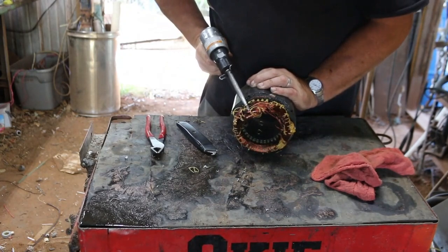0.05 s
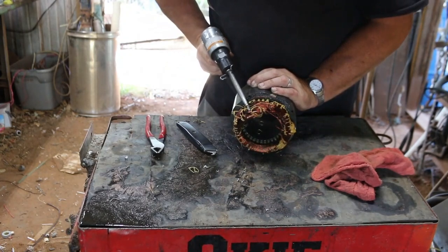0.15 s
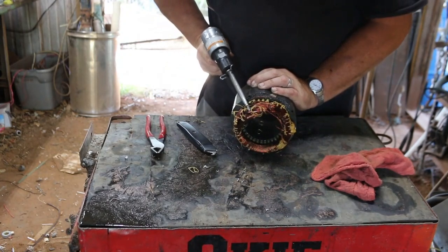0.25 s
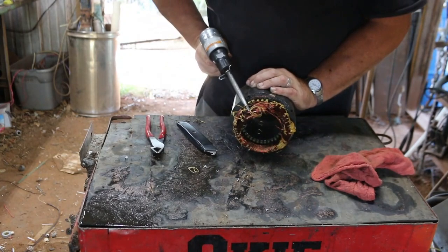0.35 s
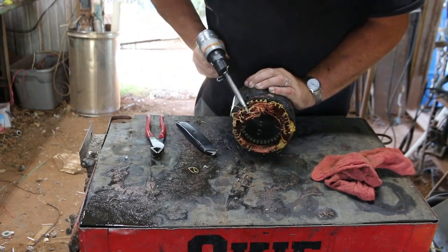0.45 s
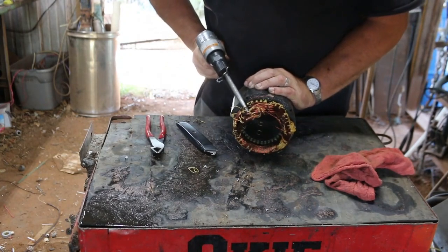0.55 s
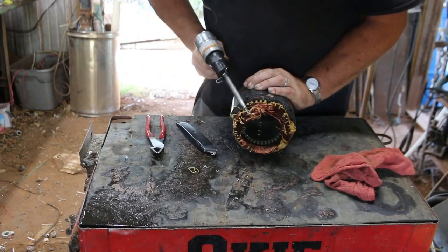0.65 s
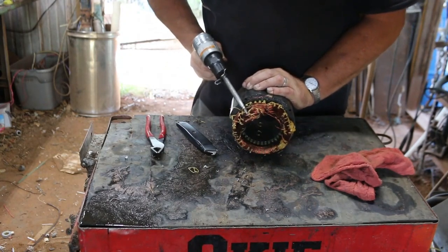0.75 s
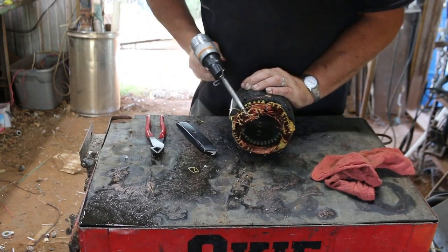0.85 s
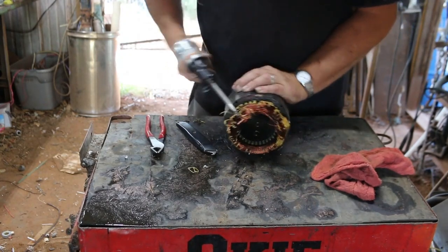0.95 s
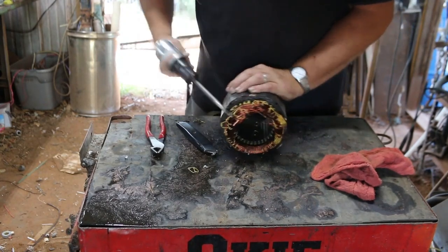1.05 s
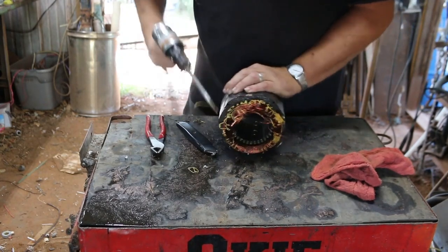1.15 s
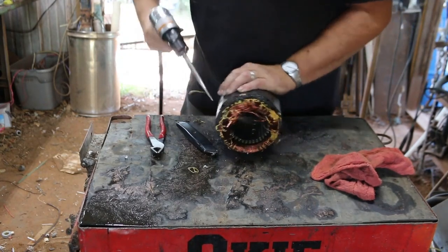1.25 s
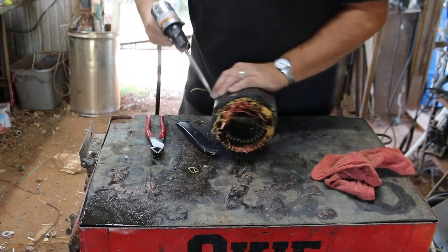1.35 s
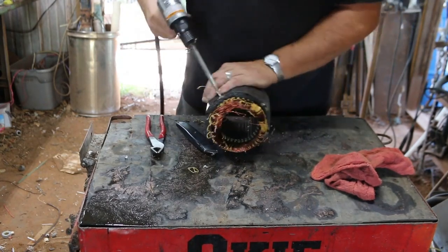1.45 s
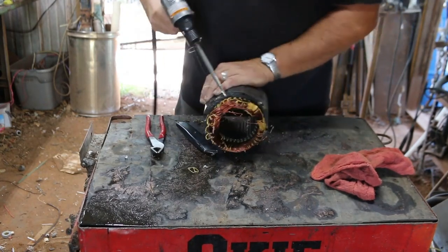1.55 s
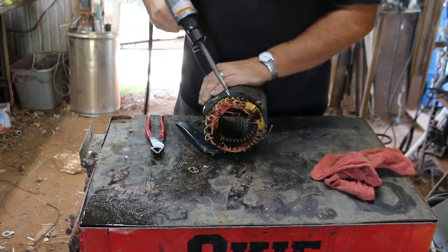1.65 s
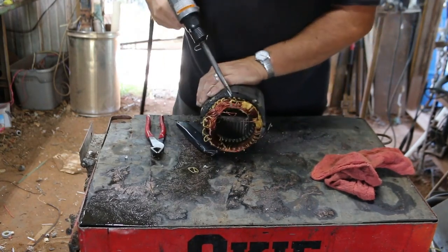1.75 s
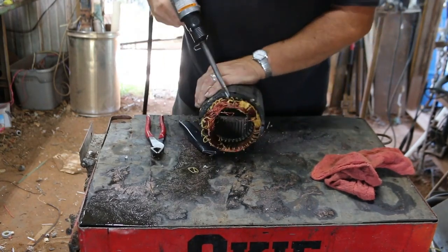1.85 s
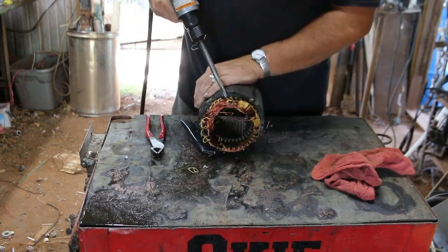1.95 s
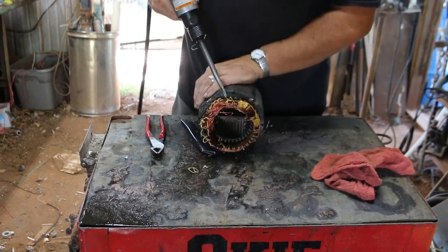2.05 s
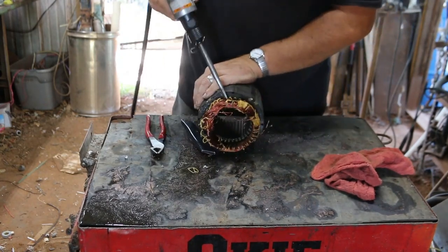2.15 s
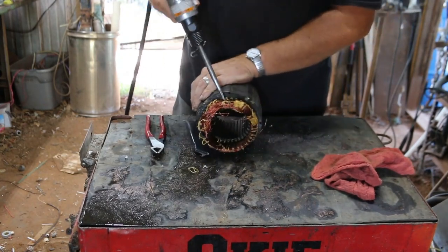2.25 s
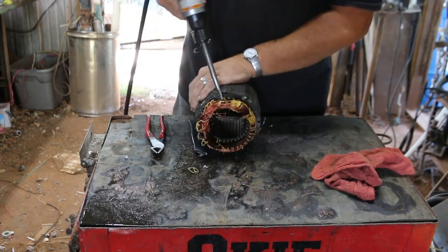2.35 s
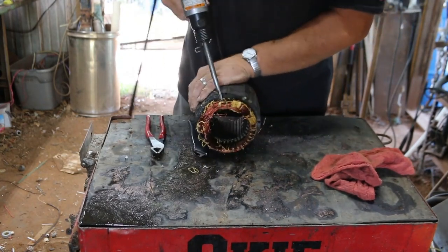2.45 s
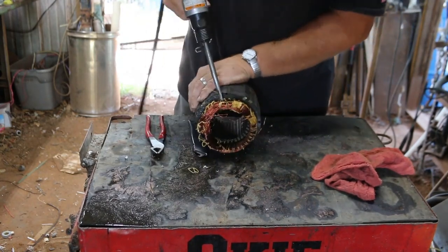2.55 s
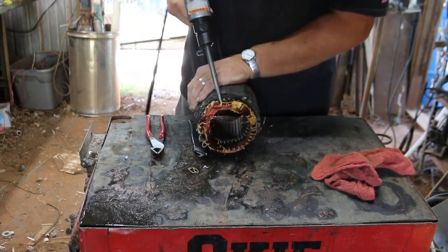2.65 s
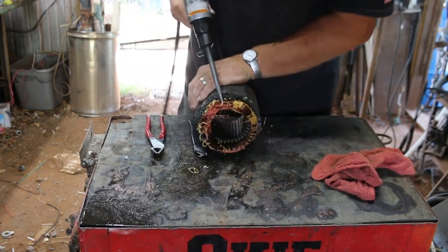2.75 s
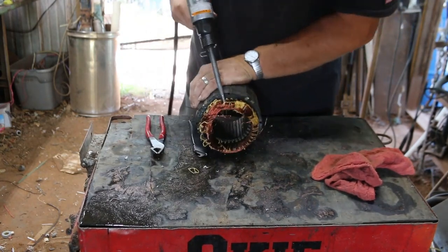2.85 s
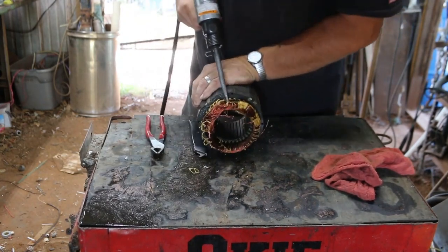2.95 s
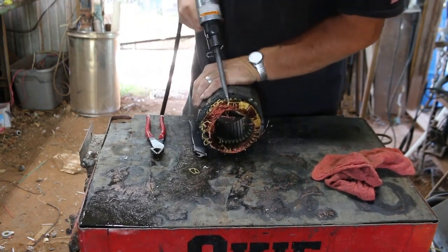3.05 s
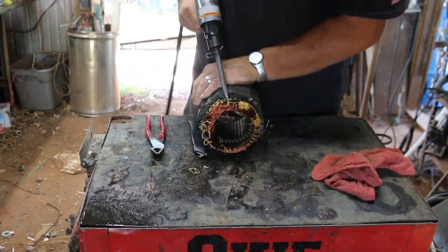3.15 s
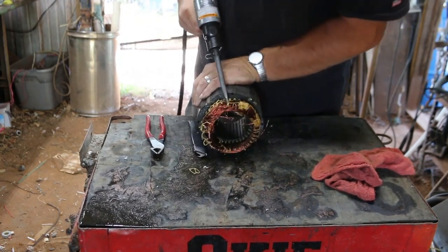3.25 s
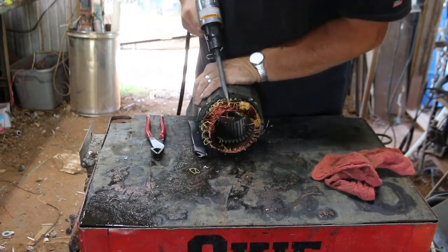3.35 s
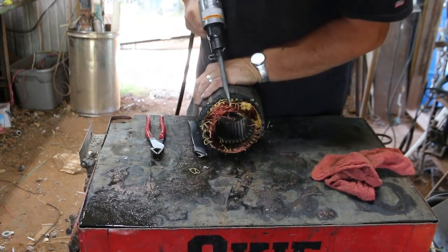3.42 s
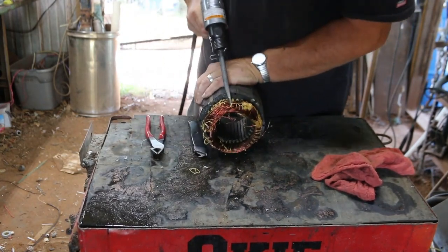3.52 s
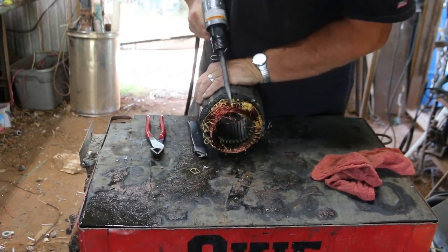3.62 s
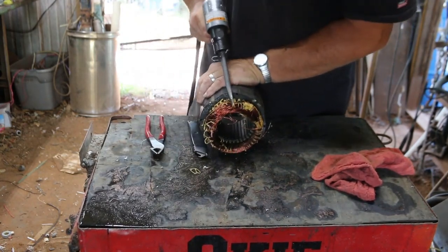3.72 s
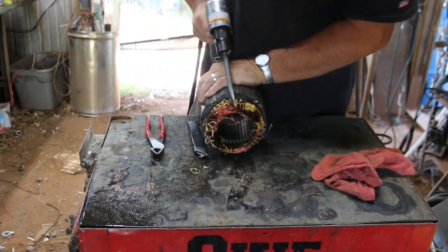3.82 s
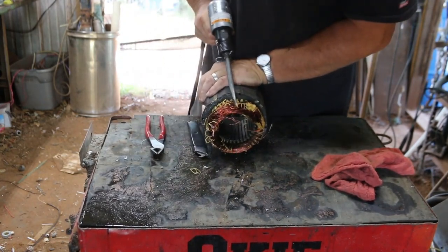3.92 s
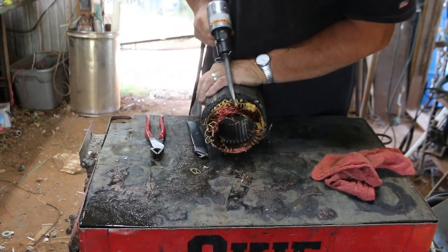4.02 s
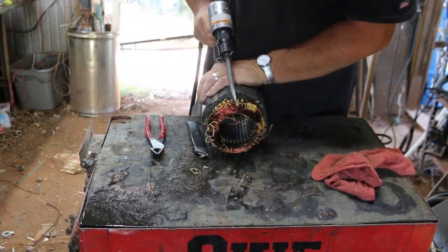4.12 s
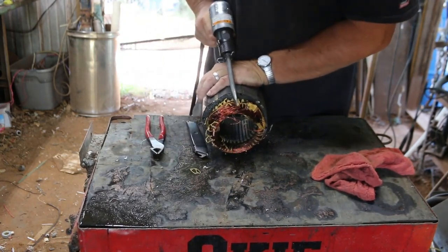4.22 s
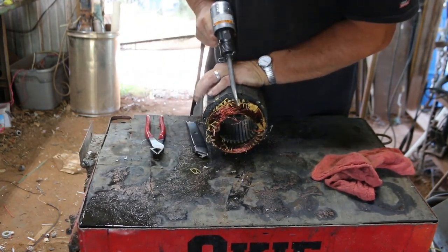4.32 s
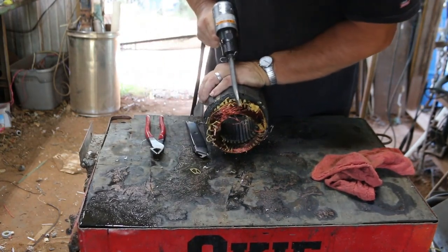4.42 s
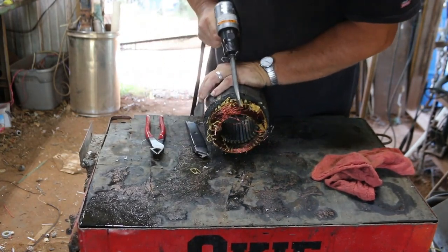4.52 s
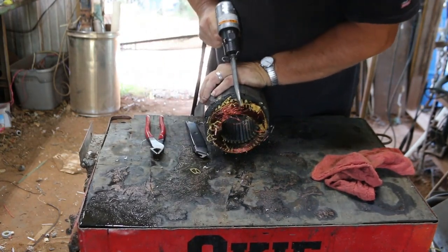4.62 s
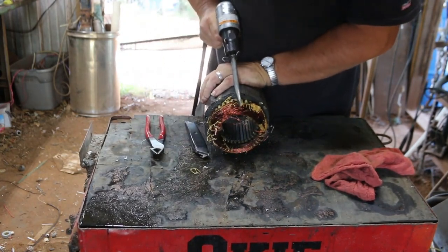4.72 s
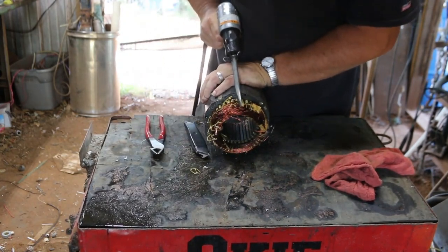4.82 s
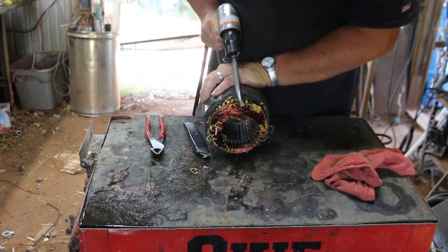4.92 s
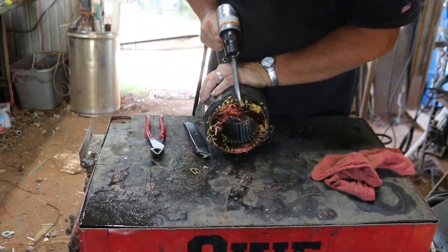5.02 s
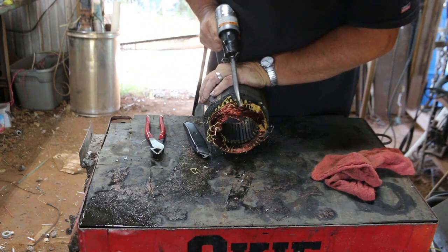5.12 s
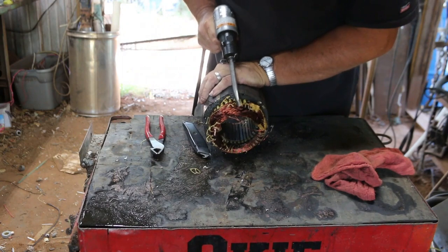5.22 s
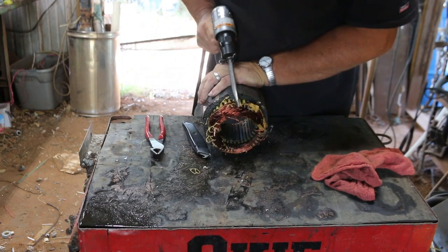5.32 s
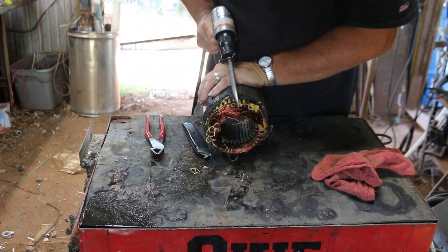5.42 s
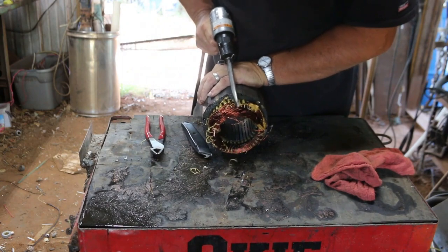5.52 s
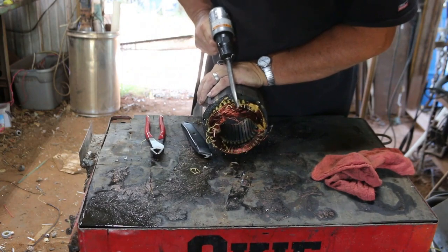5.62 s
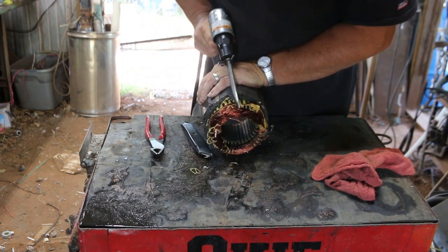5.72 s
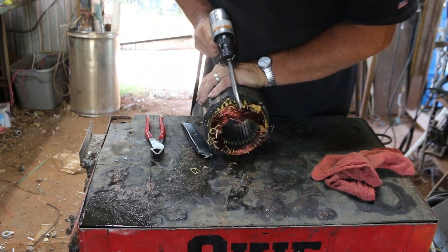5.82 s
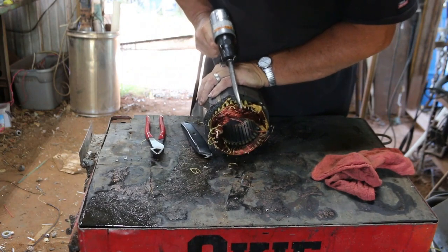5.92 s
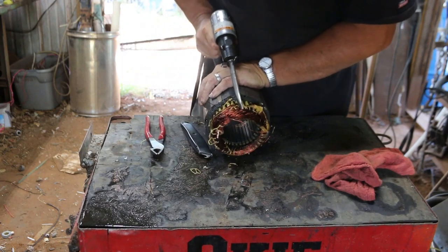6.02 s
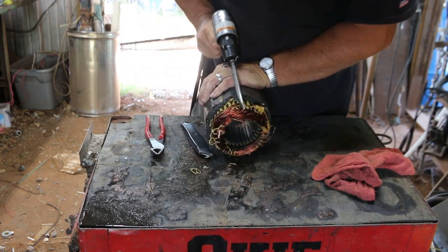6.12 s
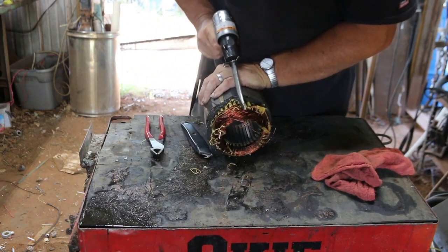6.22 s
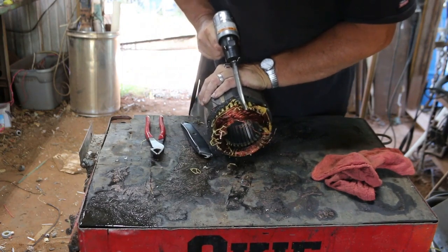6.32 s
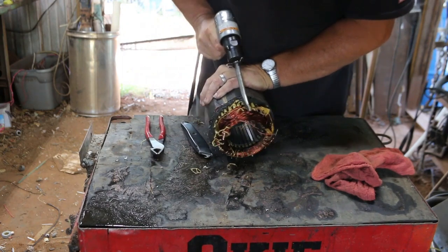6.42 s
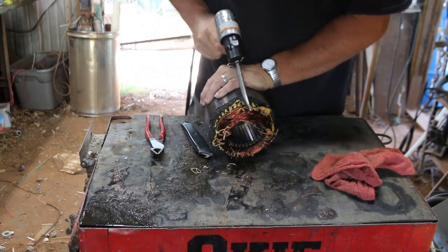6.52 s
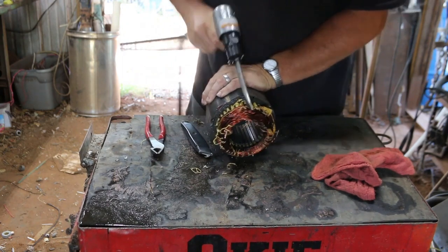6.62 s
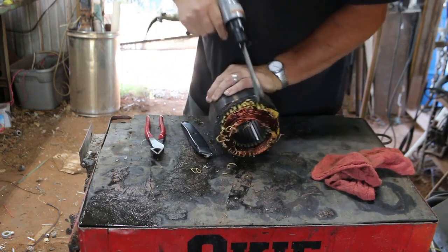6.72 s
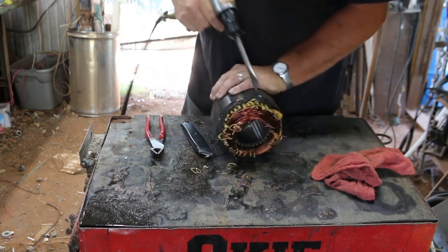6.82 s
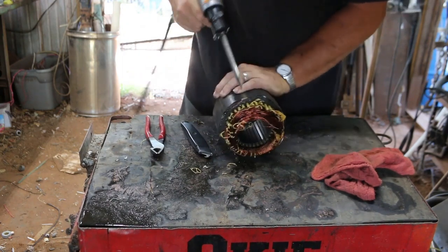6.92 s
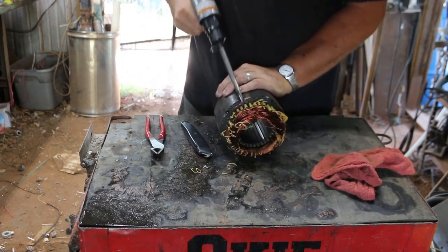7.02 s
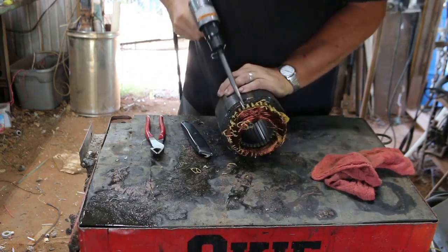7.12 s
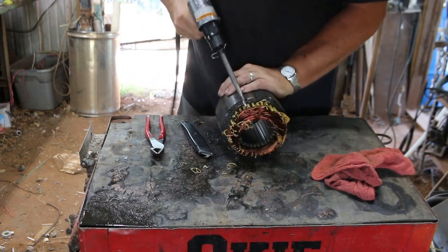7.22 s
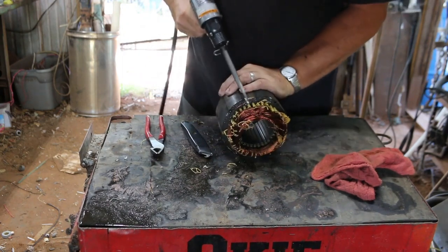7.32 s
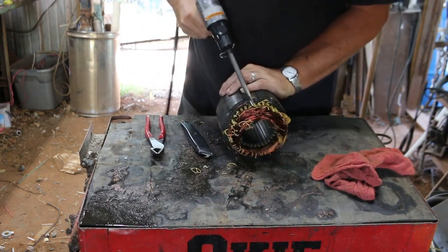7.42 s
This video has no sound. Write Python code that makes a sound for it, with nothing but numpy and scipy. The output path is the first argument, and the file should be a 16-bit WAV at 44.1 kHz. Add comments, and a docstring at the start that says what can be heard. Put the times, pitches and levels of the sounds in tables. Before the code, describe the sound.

Rapid buzzing blows of an air hammer on steel and copper windings, a windy pause with a scrape, a long second burst, then faint clinks.

```python
"""An air chisel hammers a steel and copper motor core on a metal bench in an open shed: a short burst first.
Every stroke vents a pop and two puffs of air (shaped noise) and lands one blow (dying sines); the shed rings on.
In the pause wind (low noise) buffets mostly the left microphone, the loose chisel clinks and its tip scrapes.
A longer burst follows, its first strokes the loudest. Then come more clinks, while a soft hiss swells."""
import sys
import numpy as np
from scipy import signal
from scipy.fft import rfft, irfft, next_fast_len
from scipy.io import wavfile
from scipy.ndimage import uniform_filter1d

SR = 44100
rng = np.random.default_rng(int(sys.argv[2]) if len(sys.argv) > 2 else 0)


def file_out(sig):
    """Save sig as 16-bit WAV at sys.argv[1]."""
    # one column per channel
    cols = np.atleast_2d(sig).T
    # limit, then scale
    lim = np.clip(cols, -1, 1)
    pcm = np.round(lim * 32767).astype(np.int16)
    wavfile.write(sys.argv[1], SR, pcm)


N = 329427
TIME = np.arange(N) / SR

# pace of the hammering, one list a burst, from its first pop: (start_s, strokes_per_s)
BURSTS = [
    [(.0067, 60.44), (.25, 62.09), (.4, 58.75), (.865, 56.8)],
    [(2.6584, 67.18), (3.0, 66.26), (3.25, 64.97), (3.6, 63.97), (3.8, 62.58), (3.9, 63.86), (4.4, 62.74),
     (4.72, 57.95), (5.4, 57.09), (6.519, 57.63)],
]
# the tip slips and the piston runs ahead (or, jammed, behind): (start_s, gain_share_of_a_stroke)
TIP_SLIPS = [(.563, .205), (.798, .208), (4.39, -.077), (4.804, .191), (4.939, .195), (5.131, .068),
             (5.2, .091), (5.298, .462), (5.553, .314), (5.757, .332), (6.012, .516), (6.335, .14)]


def amp(db):
    """Turns dB into gain."""
    return 10 ** (np.asarray(db) / 20)


def evened(x):
    """Scales to an average (rms) level of 1."""
    return x / np.sqrt(np.mean(x ** 2) + 1e-20)


def read(points, hz):
    """Reads a curve of (pitch_hz, value) points on a log-frequency axis."""
    f, value = np.transpose(points)
    return np.interp(np.log(hz + 1), np.log(f + 1), value)


def curves(rows):
    """Reads every column of a table at each sample, in straight lines between rows."""
    s, *columns = np.transpose(rows)
    return [np.interp(TIME, s, column) for column in columns]


def colour(x, db_at):
    """Filters by a rule that gives dB for each Hz."""
    length = x.shape[-1]
    size = next_fast_len(length)
    gain = amp(db_at(np.fft.rfftfreq(size, 1 / SR)))
    return irfft(rfft(x, size) * gain, size)[..., :length]


def smooth_noise(shape, width):
    """Slow random drift: noise averaged twice over a width in samples, then set to rms 1."""
    noise = rng.standard_normal(shape)
    return evened(uniform_filter1d(uniform_filter1d(noise, width), width))


def ring(modes):
    """What a struck thing answers: dying sines from (pitch_hz, level_db, t60_s), scaled to energy 1."""
    t = TIME[:SR // 3]
    x = sum(amp(db - 60 * t / t60) * np.sin(2 * np.pi * hz * t) for hz, db, t60 in modes)
    return x / np.linalg.norm(x)


def excite(hits, response):
    """Every hit sets off the response (convolution)."""
    return signal.oaconvolve(hits, response)[:N]


def puff(rise_ms, fall_ms):
    """Pressure of one puff of air: a quick rise and an exponential fall."""
    ms = 1000 * TIME[:800]
    return (1 - np.exp(-ms / rise_ms)) * np.exp(-ms / fall_ms)


def chisel():
    """The whole tool: all strokes share one piston; returns the tool and the core apart."""
    turns, flows = piston()
    pop_db, blow_db, bench_db, core_db, panel_db, tip_db, crack_db, thud_db = seats()
    second_start = BURSTS[1][0][0]
    since = np.maximum(TIME - second_start, 0)
    second = TIME > BURSTS[0][-1][0] + .5
    # the second burst's first strokes are the loudest: 11 dB more, fading over .017 s
    surge = amp(11 * np.exp(-since / .017) * second)
    # air rushes through before the piston has moved in the second burst: 12 dB on the leak
    rush = amp(12 * (second & (since == 0)))
    # the leak opens and closes over 120 samples, and drops abruptly at the second burst's first pop
    leak = rush * uniform_filter1d(flows, 120)

    vents = train(turns, 0, jitter_ms=.06, spread_db=.6) * surge
    blows = train(turns, .27, jitter_ms=.14, spread_db=1.6) * surge
    tool = exhaust_pops(vents * amp(pop_db))
    tool = tool + bench_ring(blows * amp(bench_db), vents * amp(panel_db), vents * amp(thud_db))
    tool = tool + steel_ring(turns, surge, blow_db, tip_db, crack_db)
    tool = tool + exhaust_air(turns, leak, surge)
    # a source this small sends out little deep bass
    bass_cut = [(50, -44.5), (100, -12.0), (125, -11.0), (170, -1.5)]
    return colour(tool, lambda hz: read(bass_cut, hz)), core_ring(blows * amp(core_db))


def piston():
    """Counts strokes over time by adding up the rate, and tells when air flows."""
    turns, flows = np.zeros(N), np.zeros(N)
    # a little ahead or behind an even beat, .01 of a stroke on average (rms)
    wander = .01 * smooth_noise(N, 1500)
    # part of a slip's gain comes at once, the rest as a short race
    at_once_share, race_s = .3, .09
    for rows in BURSTS:
        s, rate = np.transpose(rows)
        on = (TIME >= s[0] - .0098) & (TIME < s[-1] + .008)
        skipped = np.zeros(N)
        for at, share in TIP_SLIPS:
            if at > s[0]:
                still_to_come = (1 - at_once_share) * np.exp(-abs(TIME - at) / race_s)
                skipped += share * (TIME > at) * (1 - still_to_come)
        count = np.cumsum(np.interp(TIME, s, rate)) / SR
        count = count - count[round(s[0] * SR)] + 1  # the first pop is stroke 1
        turns[on] = (count + skipped + wander)[on]
        flows[on] = 1
    return turns, flows


def train(turns, at, jitter_ms, spread_db):
    """One click each time the stroke passes the point at (0-1), a little uneven in time and strength."""
    passed = np.diff(np.floor(turns - at)) == 1
    where = np.flatnonzero(passed & (turns[1:] > .9))
    chance = rng.standard_normal((300, 2))[:len(where)]
    shift = np.round(chance[:, 0] * jitter_ms * SR / 1000).astype(int)
    clicks = np.zeros(N)
    clicks[np.clip(where + shift, 0, N - 1)] = amp(spread_db * chance[:, 1])
    return clicks * np.sqrt(SR / 60)  # rms near 1 at 60 strokes per s


def seats():
    """Each seat of the tip sets how strongly the parts sound, until the tip settles anew."""
    # each new seat of the tip on the work: (start_s, pop_db, blow_db, bench_db, core_db, panel_db,
    # tip_db, crack_db, thud_db)
    bearing = [(0, -29.5, -47.5, -31, -37, -27, -69, -33.5, -42.5),
               (.37, -24, -35.5, -39.5, -31, -41, -51, -34, -35.5),
               (2.6, -24, -32.5, -32.5, -38, -31.5, -38, -38.5, -28.5),
               (3.298, -27, -36, -31, -35, -34.5, -37, -39, -38),
               (3.622, -27.5, -39, -33, -33, -28.5, -45, -41, -47),
               (4.45, -24.5, -34.5, -30.5, -29.5, -39.5, -44, -44, -35.5),
               (5.5, -23, -33.5, -31.5, -28, -49, -53, -43.5, -33.5)]
    s, *columns = np.transpose(bearing)
    row = np.maximum(np.searchsorted(s, TIME) - 1, 0)
    settle_s = 0.079
    return uniform_filter1d(np.array(columns)[:, row], round(settle_s * SR) + 1, mode="nearest")


def exhaust_pops(vents):
    """A short slug of air between two rarefactions, then its echoes."""
    # the pop thrown back by bench, body and walls: (delay_ms, level_db)
    echoes = [(4.6, -14), (6.0, -17.5), (9.0, -19), (11.2, -17)]
    u = (np.arange(-150, 151) / SR * np.pi * 400) ** 2  # the slug is strongest near 400 Hz
    slug = (1 - 2 * u) * np.exp(-u)
    paths = np.zeros(800)
    paths[0] = 1
    for ms, db in echoes:
        paths[round(ms * SR / 1000)] = amp(db)
    pop = np.convolve(slug, paths)
    return signal.oaconvolve(vents, pop / np.linalg.norm(pop))[150:N + 150]  # slug centred on the vent


def bench_ring(blows, panel_vents, thud_vents):
    """The bench rings at each blow and slip; a panel and a thud answer each vent."""
    # ring of the bench: (pitch_hz, relative_level_db, t60_s)
    bench_modes = [(205, -24.5, 0.014), (270.6, 10.5, 0.12), (342.4, 12, 0.059), (424, -10, 0.1),
                   (794.4, 2, 0.13), (879, 13, 0.037), (1056, -17, 0.18)]
    # modes that depend on where the tip bears: (pitch_hz, relative_level_db, t60_s)
    panel_modes = [(248, -14, 0.029), (351, 0.5, 0.053), (659, 0, 0.15), (759, 1, 0.047)]
    thud_modes = [(130.6, 0, 0.041)]
    # the core jumps on the bench at every slip
    jolts = np.zeros(N)
    slip_s = np.transpose(TIP_SLIPS)[0]
    jolts[np.round(slip_s * SR).astype(int)] = amp(-33.5) * np.sqrt(SR / 20)
    bench = excite(blows + jolts, ring(bench_modes))
    bench += excite(panel_vents, ring(panel_modes))
    return bench + excite(thud_vents, ring(thud_modes))


def core_ring(blows):
    """The motor core rings at every blow."""
    # ring of the core: (pitch_hz, relative_level_db, t60_s)
    core_modes = [(1003, -2, .22), (1050, -11, .12), (975, 1, .05)]
    return excite(blows, ring(core_modes))


def steel_ring(turns, surge, blow_db, tip_db, crack_db):
    """The blow chatters for a few ms, so the chisel and wire never ring twice alike; cracks go with it."""
    # ring of chisel and wire: (pitch_hz, relative_level_db, t60_s)
    steel_modes = [(1760, -9, .04), (2190, 3, .045), (2341, -3, .06), (2600, -2, .03), (2770, 4, .02),
                   (2916, -3, .045), (3600, -4, .015), (3980, -1, .02), (4210, -1, .035)]
    # modes that depend on where the tip bears: (pitch_hz, relative_level_db, t60_s)
    tip_modes = [(2577, 0, 0.036)]
    crack_modes = [(2100, 0, 0.009)]
    strikes = train(turns, .36, jitter_ms=.1, spread_db=1.5)
    strikes += .9 * train(turns, .94, jitter_ms=.08, spread_db=1.2)
    chatter = excite(strikes, puff(.15, .8)) * rng.standard_normal(N) + 3.5 * strikes
    chatter = evened(chatter) * surge
    cracks = train(turns, .95, jitter_ms=.1, spread_db=1.5) * surge
    steel = excite(chatter * amp(blow_db), ring(steel_modes))
    steel += excite(chatter * amp(tip_db), ring(tip_modes))
    return steel + excite(cracks * amp(crack_db), ring(crack_modes))


def exhaust_air(turns, leak, surge):
    """Coloured noise in puffs: sharp near the pop, softer on the return stroke, over a leak."""
    # colour of the exhaust air: (pitch_hz, relative_db_per_hz)
    air_colour = [(710, -26), (1200, -12), (1520, -29), (2200, -1.5), (2830, -4), (3360, -3.5), (4150, -5),
                  (4860, -10), (6500, -9), (9500, -8), (16000, -9)]
    # the exhaust ports whistle faintly as the grip shifts: (time_s, pitch_hz, db_against_jet)
    port = [(0, 9400, -17), (2.65, 9700, -13), (3.65, 11500, -12), (4.05, 11500, -28), (4.15, 9800, -24),
            (4.35, 9800, -14), (6.6, 9600, -20)]
    sharp = excite(train(turns, .96, jitter_ms=.12, spread_db=1.2), puff(.25, 1.6))
    soft = excite(train(turns, .3, jitter_ms=.4, spread_db=2.5), puff(1.2, 3.5))
    flow = sharp + .4 * soft + 2.0 * leak

    shared = .8  # how alike the air noise is in the two microphones, before colouring
    same, own = rng.standard_normal(N), rng.standard_normal((2, N))
    noise = shared * same + np.sqrt(1 - shared ** 2) * own
    jet = evened(colour(noise, lambda hz: read(air_colour, hz) - 40 * (hz < 1000)))
    # whistle: noise in a narrow band (900 Hz wide) that follows the port pitch
    port_hz, port_db = curves(port)
    turn = np.exp(2j * np.pi * np.cumsum(port_hz) / SR)
    r = np.exp(-np.pi * 900 / SR)
    whistle = evened((turn * signal.lfilter([1 - r], [1, -r], same / turn)).real)
    return amp(-28.5) * surge * evened(flow) * (jet + amp(port_db) * whistle)


def clinks():
    """The shank rattles for a few ms and rings; ticks are bright specks, scrapes swelling noise."""
    # the loose chisel knocks in its holder: (start_s, peak_db)
    knocks = [(1.673, -40.5), (6.778, -47.5), (6.8064, -51.5), (6.8274, -64), (6.8684, -62.5),
              (7.1804, -45.5), (7.449, -44)]
    # ring of the shank: (pitch_hz, relative_level_db, t60_s)
    shank_modes = [(2000, 9, 0.008), (5000, -5, 0.027), (5060, -2, .03), (5130, 6, 0.03), (8080, -3, 0.03),
                   (8620, 1, 0.06), (9230, 1.5, 0.029), (12620, -14, .06)]
    # the valve ticks: (start_s, level_db)
    ticks = [(0.8994, -38), (1.8344, -51), (2.5344, -45), (6.551, -28), (6.6945, -49)]
    # the tip drags over wire: (start_s, level_db)
    scrapes = [(2.2441, -31.5), (2.3044, -25.5)]
    out, shank = np.zeros(N + SR), ring(shank_modes)
    for s, db in knocks:
        rattle = rng.standard_normal(800) * puff(0.86, 32)
        knock = np.convolve(rattle, np.r_[.3, shank])  # .3: the rattle itself, before the ring
        out[round(s * SR):][:len(knock)] += amp(db) * knock / abs(knock).max()
    treble = signal.butter(2, 6000, "high", fs=SR, output="sos")
    for s, db in ticks:
        bright = signal.sosfilt(treble, rng.standard_normal(800))
        out[round(s * SR):][:800] += amp(db) * bright * puff(.2, 2.5)
    rasp_colour = [(300, -24.5), (1000, -6.0), (7000, -12.0), (10000, -13.5), (15000, -30)]
    rise_s, t60_s = .002, .12
    for s, db in scrapes:
        t = np.maximum(TIME - s, 0)
        rasp = colour(rng.standard_normal(N), lambda hz: read(rasp_colour, hz))
        out[:N] += amp(db - 60 * t / t60_s) * (1 - np.exp(-t / rise_s)) * rasp
    return out[:N]


def shed(x):
    """Echo tails: sparse taps of random sign dying by band; long waves reach both microphones alike."""
    # how long the shed rings: (pitch_hz, t60_s)
    shed_t60 = [(150, 0.51), (400, 0.19), (1040, 0.29), (2760, 0.24), (7280, 0.21)]
    likeness = [(300, 0.97), (1400, 0.89), (3000, 0.65), (7000, 0.033)]
    tail_colour = [(300, -9.5), (900, 5), (2000, -0.5)]
    tails = 6  # several random tails take turns, so no one draw colours the echo
    out = np.zeros((2, N))
    for k in range(tails):
        taps = np.zeros((3, SR // 2))  # one row for both microphones, then one for each
        grid = np.arange(400, SR // 2 - 20, 20)
        at = grid + rng.integers(0, 20, (3, len(grid)))
        np.put_along_axis(taps, at, rng.choice([-1., 1.], at.shape), 1)
        hz, t, z = signal.stft(taps, SR, nperseg=512)
        alike = np.clip(read(likeness, hz), 0, 1)[:, None]
        z = alike * z[0] + np.sqrt(1 - alike ** 2) * z[1:]
        dying = amp(-60 * t / read(shed_t60, hz)[:, None])
        tail = signal.istft(z * dying, SR, nperseg=512)[1]
        tail = colour(tail / np.linalg.norm(tail[0]), lambda hz: read(tail_colour, hz))
        share = np.sqrt(8 / 3 / tails) * np.cos(np.pi * (1.3 * TIME + k / tails)) ** 2
        out += signal.fftconvolve(x * share, tail, axes=1)[:, :N]
    return out


def slaps():
    """Each eddy is a few cycles of falling pitch, almost all in the left microphone."""
    # eddies that slap the left microphone: (start_s, level_db)
    eddies = [(1.385, -19), (1.481, -31), (1.617, -24.5), (1.656, -29), (1.814, -27), (1.841, -35),
              (2.049, -25), (2.255, -30), (2.431, -29), (2.524, -14)]
    sudden = 0.38  # how abruptly an eddy sets in, 0-1
    rise_s = 0.00031 + 0.00085 * (1 - sudden)
    out, t = np.zeros(N), TIME[:4000]
    for s, db in eddies:
        a, b = rng.random(2)
        hz = (170 + 60 * a) * (1 + 4 * sudden * np.exp(-t / 0.0028))
        wave = np.sin(2 * np.pi * (np.cumsum(hz) / SR + b))
        out[round(s * SR):][:4000] += amp(db - 60 * t / 0.19) * (1 - np.exp(-t / rise_s)) * wave
    return out * amp([[0], [-22]])  # left, right


def wind():
    """Lumpy low noise, unrelated in the two microphones; each gust rises, holds and dies."""
    # light wind under everything: (time_s, left_db, right_db)
    breeze = [(0, -41, -51), (1.0, -49.5, -61.5), (2.7, -40.5, -46), (4.0, -43, -55), (4.4, -57, -60),
              (4.7, -48, -55), (6.9, -55, -64.5), (7.2, -68, -82), (7.47, -59, -53.5)]
    # gusts on the microphones: (start_s, hold_s, left_db, right_db)
    gusts = [(1.098, 0.4, -37.5, -70), (1.237, 0.027, -29.5, -57), (1.367, 0.07, -26, -58),
             (1.485, 0.03, -30.5, -47), (1.55, .02, -43, -39), (1.602, 0.086, -25.5, -42),
             (1.74, .17, -29, -57), (2.027, 0.023, -23, -46), (2.1, 0.035, -49, -47),
             (2.244, 0.063, -18.5, -41), (2.369, 0.027, -16, -32), (2.5, 0.032, -17, -30),
             (2.59, 0.032, -12.5, -25)]
    # colour of the wind: (pitch_hz, relative_db_per_hz)
    wind_colour = [(13, -29.5), (22, -13.5), (92, 9.5), (144, 10), (258, -3.5), (302, -5.5), (487, -43),
                   (700, -45), (910, -63.5), (1540, -120)]
    edge_colour = [(200, -39.5), (350, -10.5), (700, -30.5), (1500, -49.5), (3000, -85)]
    rise_s, fall_db_per_s = .015, 215
    power = amp(curves(breeze)) ** 2
    for start, hold, *db in gusts:
        t = TIME - start
        shape = np.clip(t / rise_s, 0, 1) * amp(-fall_db_per_s * np.maximum(t - hold, 0))
        power = power + np.outer(amp(db), shape) ** 2
    noise = rng.standard_normal((2, N))
    body = evened(colour(noise, lambda hz: read(wind_colour, hz) - 60 * (hz > 900)))
    edge = evened(colour(noise, lambda hz: read(edge_colour, hz)))
    lumps = smooth_noise((2, N), 500)
    # 3.2 dB (rms) of unevenness; the higher-pitched edge grows more than the body in each lump
    return np.sqrt(power) * amp(3.2 * lumps) * (body + amp(-26 + 2.5 * lumps) * edge)


def hush():
    """Background hiss that starts low when a burst ends and swells as the pause goes on."""
    # colour of the hiss: (pitch_hz, relative_db_per_hz)
    hush_colour = [(88, -23), (150, -11), (376, -17), (745, -15.5), (998, -17), (1500, -23.5),
                   (1750, -17.5), (2100, -20), (7920, -26), (16000, -30)]
    same, own = rng.standard_normal(N), rng.standard_normal((2, N))
    hiss = evened(colour(0.47 * same + 0.94 * own, lambda hz: read(hush_colour, hz)))
    first_end, second_start, second_end = BURSTS[0][-1][0], BURSTS[1][0][0], BURSTS[1][-1][0]
    pause_start = np.where(TIME < second_start, first_end, second_end)
    paused_s = np.maximum(TIME - pause_start, 0)
    return amp(-71 + 11.5 * paused_s) * hiss  # dB, dB per s


def scene():
    """The tool and its clinks in the shed, over wind and hiss."""
    # how the tool leans to one side: (pitch_hz, left_over_right_db)
    lean = [(60, 3), (240, 3.5), (950, 1), (3770, 0.5), (15000, -0.5)]
    tool, core = chisel()
    near = tool + clinks()
    # the core's ring is mostly dry; only a little goes into the shed
    near = near + core + amp(-3) * shed(near + .3 * core)
    leaning = colour(near, lambda hz: np.outer([.5, -.5], read(lean, hz)))
    return leaning + wind() + slaps() + hush()


def record(dry):
    """Bass cut, overload at full scale, then a band limit at 15850 Hz."""
    x = signal.sosfilt(signal.butter(1, 40, "high", fs=SR, output="sos"), dry)
    x = np.clip(x, -1, 1)
    band_limit = signal.firwin(511, 15850, window=("kaiser", 9), fs=SR)
    return signal.oaconvolve(x, band_limit[None], "same")


dry = scene()
out = record(dry)
file_out(out)
```